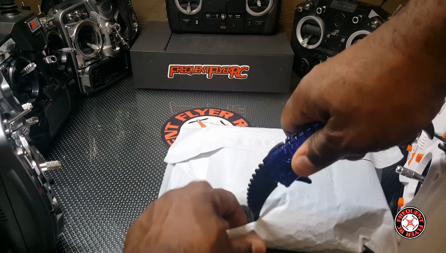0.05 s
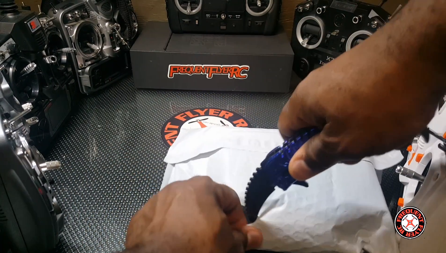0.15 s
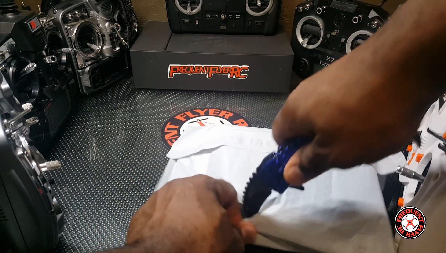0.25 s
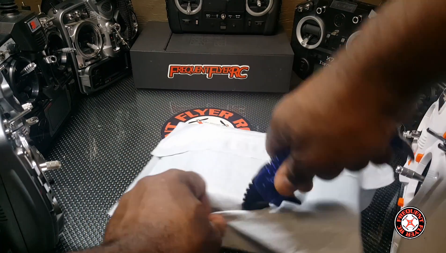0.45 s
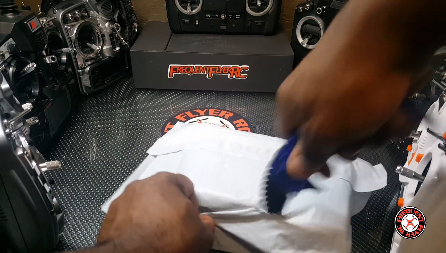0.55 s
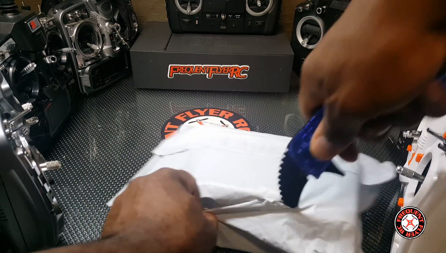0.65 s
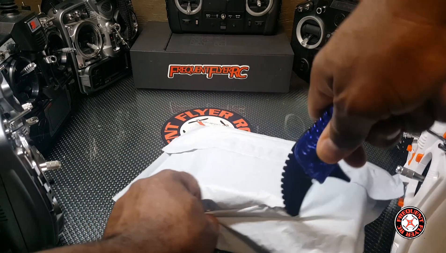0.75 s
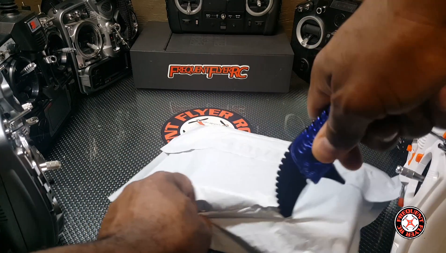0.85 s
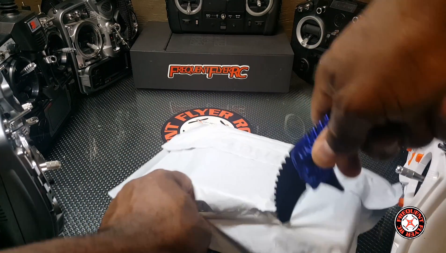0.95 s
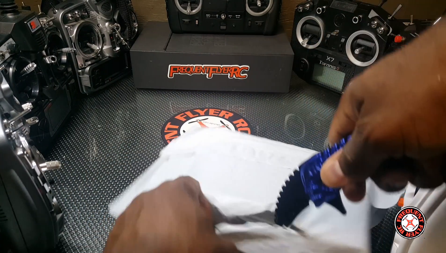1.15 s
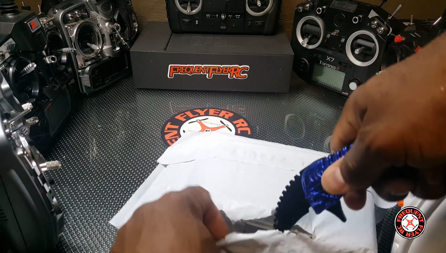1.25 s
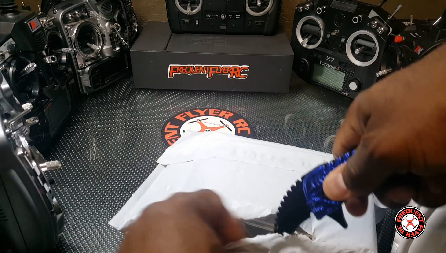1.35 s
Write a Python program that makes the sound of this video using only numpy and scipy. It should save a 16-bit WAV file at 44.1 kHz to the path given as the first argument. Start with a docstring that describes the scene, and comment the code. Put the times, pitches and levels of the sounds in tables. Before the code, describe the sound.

Close, dry crinkling of a plastic parcel being held and cut with a serrated blade: sharp film snaps and low padded knocks peak early, then fade to small light ticks over quiet room tone.

```python
"""Crackle, snapping creases and dull thumps run through the whole scene: a padded plastic mailer is held
and sawn open with a serrated blade on a table, close to the microphone. Creases are short damped sines
with bursts of treble noise, the parcel's thumps are lower damped modes, and the strained film is a shower
of tiny grains over shaped noise. A small room answers the snaps and thumps; steady room tone and a table
rumble lie below."""
import sys
import numpy as np
from scipy import signal
from scipy.fft import rfft, irfft, next_fast_len
from scipy.io import wavfile
from scipy.ndimage import map_coordinates

SR = 44100
rng = np.random.default_rng(int(sys.argv[2]) if len(sys.argv) > 2 else 0)


def makeup_ratio(level_db):
    """Linear amplitude ratio for a level in decibels (20 dB per factor of ten)."""
    decades = np.asarray(level_db, float) / 20
    return 10 ** decades


def to_wav(sig):
    """Store sig (one row per channel, or 1-D mono) as 16-bit WAV at the path in sys.argv[1].

    Samples outside -1..1 are clipped; the rate is SR.
    """
    pcm = np.clip(np.atleast_2d(sig), -1, 1) * 32767
    pcm = np.round(pcm).astype(np.int16)
    wavfile.write(sys.argv[1], SR, pcm.T)  # frames by channels


N = 61739  # length in samples, 1.4 s


def unit(x):
    """Scale to rms 1."""
    return x / np.sqrt(np.mean(x ** 2) + 1e-20)


def along(points, hz):
    """Interpolate (Hz, value) points on a log frequency axis."""
    f, value = np.transpose(points)
    return np.interp(np.log(hz + 1), np.log(f + 1), value)


def filtered(x, response):
    """Multiply the spectrum of x by a response of frequency."""
    size = next_fast_len(N + 8192)
    spectrum = rfft(x, size) * response(np.fft.rfftfreq(size, 1 / SR))
    return irfft(spectrum, size)[..., :N]


def noise(spectrum):
    """Coloured noise of rms 1."""
    white = rng.standard_normal(N)
    return unit(filtered(white, lambda hz: makeup_ratio(along(spectrum, hz))))


def wobble(rate):
    """A smooth random curve with rate knots a second."""
    knots = rng.standard_normal(int(N * rate / SR) + 4)
    return map_coordinates(knots, [np.arange(N) * rate / SR])


def lay(start_s, rows):
    """Sum the rows of a matrix, each starting at its time."""
    at = np.round(start_s * SR).astype(int)[:, None] + np.arange(rows.shape[1])
    return np.bincount(at.ravel(), rows.ravel(), N + SR)[:N]


def rings(db, hz, t60, size, attack=0.00022):
    """One damped sine a row, size samples long, swelling with the attack time constant in seconds."""
    t = np.arange(size) / SR
    db, hz, t60 = (np.broadcast_to(v, np.shape(db))[:, None] for v in (db, hz, t60))
    decay = makeup_ratio(db - 60 * t / t60)
    return decay * np.sin(2 * np.pi * hz * t) * (1 - np.exp(-t / attack))


# Tone of the quiet room. Each row: frequency in Hz, relative density in dB per Hz.
ROOM_TONE_SPECTRUM = [(24, -16), (40, 14.5), (377, -28), (550, -8), (656, -24), (12800, -40), (16500, -54)]


def room_tone():
    """The air of the place: steady noise, mostly low."""
    return makeup_ratio(-46.5) * noise(ROOM_TONE_SPECTRUM)


# How long the room holds each frequency. Each row: frequency in Hz, t60 in seconds.
ROOM_DECAY = [(200, 0.28), (2000, 0.23), (10000, 0.009)]


def room(x):
    """Each frequency of the room's answer dies at its own speed; it starts 90 samples late."""
    hz, t, grid = signal.stft(rng.standard_normal(SR // 3), SR, nperseg=256)
    decay = makeup_ratio(-60 * t / along(ROOM_DECAY, hz)[:, None])
    tail = signal.istft(grid * decay, SR, nperseg=256)[1]
    return signal.fftconvolve(np.pad(x, (90, 0)), tail / np.linalg.norm(tail))[:N]


# Deep rumble of the table. Each row: frequency in Hz, relative density in dB per Hz.
TABLE_SPECTRUM = [(20, 4), (55, 15), (110, -14), (200, -50)]


def table_rumble(swing_db):
    """Handling shakes the table: deep noise that partly follows the swing of the strain."""
    level_db = -47.5 + 0.77 * swing_db + 1.8 * wobble(7.4)
    return makeup_ratio(level_db) * noise(TABLE_SPECTRUM)


# Lows of the padding. Each row: frequency in Hz, relative density in dB per Hz.
PADDING_SPECTRUM = [(47, -41), (80, -1.5), (316, -6.5), (403, -9), (1000, -16.5), (1300, -55), (2200, -120)]


def padding_rumble(swing_db):
    """The padding rumbles on the table: lumpy low noise that partly follows the swing of the strain."""
    lumps_db = 1.5 * wobble(40)
    return makeup_ratio(-44.5 + 0.69 * swing_db + lumps_db) * noise(PADDING_SPECTRUM)


def settling(db):
    """After each snap the creases around it settle: a level that dies away, added in power."""
    SETTLE_T60, RISE_S = 0.025, 0.0029
    t = np.arange(4000) / SR
    power = makeup_ratio(db[:, None] - 60 * t / SETTLE_T60) ** 2 * (1 - np.exp(-t / RISE_S))
    return np.sqrt(lay(np.transpose(CREASE_SNAPS)[0], power))


def grains(rate, hz, octaves, cycles, spread_db):
    """A random shower of tiny snaps, rate a second, scattered in pitch and size; rms 1."""
    count = int(rate * N / SR)
    u, g = rng.random((count, 2)), rng.standard_normal(count)
    pitch = np.clip(hz * 2 ** (octaves * g), 950, 15500)
    size_db = np.minimum(-spread_db * np.log(u[:, 1]), 4 * spread_db)
    shower = rings(size_db, pitch, cycles / pitch, size=400, attack=0.0001)
    return unit(lay(u[:, 0] * N / SR, shower))


# Rustle of the film. Each row: frequency in Hz, relative density in dB per Hz.
RUSTLE_SPECTRUM = [(500, -6), (900, -20), (1270, 7.5), (1800, -43), (2600, 1.5), (3600, -9.5), (5000, -31),
                   (8000, -52)]


def film_crackle(level):
    """The stressed film crackles in tiny grains over a rustle of shaped noise."""
    crackle = makeup_ratio(-2) * grains(rate=1600, hz=2330, octaves=0.6, cycles=4.9, spread_db=3)
    return level * (crackle + makeup_ratio(-5.5) * noise(RUSTLE_SPECTRUM))


# Treble of hiss and cracks. Each row: frequency in Hz, relative density in dB per Hz.
TREBLE_SPECTRUM = [(2500, -10.5), (4000, -1.5), (5200, -6.5), (7000, -8), (11500, -8), (15300, -23),
                   (16100, -37), (16800, -50)]


def film_hiss(level):
    """The film hisses in the treble, and the hiss flickers."""
    flicker_db = 2.7 * wobble(500)
    return level * makeup_ratio(-6 + flicker_db) * noise(TREBLE_SPECTRUM)


# Strain on the film. Each row: time in seconds, crackle level in dB, hiss level in dB,
# both before the trims and the flurries of settling.
FILM_STRAIN = [(0, -48, -48), (0.068, -38, -39.5), (.12, -45.5, -44), (.19, -48.5, -42.5), (.3, -42, -42.5),
               (.38, -30, -30.5), (0.411, -40.5, -34), (0.432, -22, -21), (0.46, -38, -38.5),
               (0.489, -23.5, -27), (0.529, -35, -38), (0.569, -41, -41), (0.587, -27.5, -36.5),
               (0.652, -32.5, -32.5), (0.68, -23, -31.5), (0.721, -38.5, -40), (.79, -46, -46.5),
               (.87, -51, -49), (.95, -54.5, -46), (.99, -57.5, -61), (1.027, -59, -48),
               (1.049, -46.5, -37.5), (1.1, -46, -42.5), (1.14, -52, -47), (1.171, -42, -40.5),
               (1.251, -42.5, -44.5), (1.29, -52.5, -51), (1.4, -51, -47)]


def strain():
    """The film under strain crackles, rustles and hisses; the padding and the table rumble along."""
    SETTLE_DB, SETTLE_HISS_DB = -24.5, -8.5  # added to each snap's ring and crack levels
    s, *columns = np.transpose(FILM_STRAIN)
    crackle_db, hiss_db = (np.interp(np.arange(N) / SR, s, c) for c in columns)
    _, snap_db, _, _, crack_db = np.transpose(CREASE_SNAPS)
    swing_db = crackle_db - crackle_db.mean()
    shared_wobble = makeup_ratio(1.2 * wobble(90))
    film = film_crackle(makeup_ratio(crackle_db) + settling(snap_db + SETTLE_DB))
    hiss = film_hiss(makeup_ratio(hiss_db) + settling(crack_db + SETTLE_HISS_DB))
    return shared_wobble * (film + hiss + padding_rumble(swing_db)) + table_rumble(swing_db)


# Modes of the padded wall. Each row: multiple of the knock's pitch, level in dB before scatter.
WALL_MODES = [(1, -1), (1.68, -5), (2.6, -12)]
# The padded wall flexes with a dull knock. Each row: start in seconds, level in dB before the trim,
# pitch in Hz, t60 of the lowest mode in seconds.
WALL_THUMPS = [(0.0382, -24.5, 438, 0.025), (.069, -23, 260, 0.039), (.078, -21, 143, 0.06),
               (0.2058, -17.5, 344, 0.03), (.2058, -11, 790, 0.0092), (0.264, -26.5, 285, 0.034),
               (0.312, -14.5, 232, 0.024), (0.351, -23, 197, 0.053), (.376, -23, 193.3, 0.094),
               (.422, -22, 548, 0.055), (.43, -19.5, 160, 0.076), (.479, -9.5, 317, 0.047),
               (.487, -6.5, 316, 0.044), (0.499, -26, 229, 0.066), (.576, -17.5, 177.5, 0.065),
               (0.591, -20.5, 208, 0.057), (.635, -20.5, 490, .03), (0.67, -30, 336, 0.015),
               (.6852, -7, 693, 0.018), (0.687, -3, 312.6, 0.046), (0.704, -17.5, 207.5, 0.13),
               (0.7151, -8, 505, 0.027), (.722, -13.5, 333, .07), (.739, -19, 208, 0.029),
               (0.754, -24.5, 587, 0.024), (.812, -29, 230, 0.054), (.904, -28, 218, 0.038),
               (0.924, -34.5, 235, 0.035), (1.109, -32.5, 518, 0.064), (1.1509, -25, 551, 0.055),
               (1.152, -23.5, 250, 0.023), (1.162, -30.5, 640, 0.027), (1.165, -29, 248, 0.11),
               (1.209, -23, 290, 0.047), (1.209, -29, 566, 0.036), (1.242, -27.5, 121, 0.068),
               (1.356, -32.5, 316, 0.019)]


def thumps():
    """Each flex rings at the pitch its fold gives it; the upper modes die sooner."""
    THUMP_DB, RISE_CYCLES = 3, 0.3  # trim; swell time constant in cycles of the pitch
    THUMP_LOW_CUT_HZ = 93  # the thumps carry little below this
    s, db, pitch, t60 = np.transpose(WALL_THUMPS)
    scatter_db = rng.normal(0, 2, (len(s), len(WALL_MODES)))
    scatter_db[:, 0] = 0  # the lowest mode keeps its level
    rise = RISE_CYCLES / pitch[:, None]
    rows = 0
    for k, (ratio, level) in enumerate(WALL_MODES):
        mode_db = db + THUMP_DB + level + scatter_db[:, k]
        rows = rows + rings(mode_db, pitch * ratio, t60 / ratio, size=4000, attack=rise)
    return filtered(lay(s, rows), lambda f: (1j * f / (THUMP_LOW_CUT_HZ + 1j * f)) ** 2)


# Creases buckling. Each row: start in seconds, ring level in dB, ring pitch in Hz,
# air pocket level in dB, crack level in dB, the levels before the trims.
CREASE_SNAPS = [(0.065, -23, 1780, -28, -28), (0.069, -14.5, 3160, -28, -39),
                (0.104, -23, 3300, -25, -27.5), (0.2099, -18, 2450, -38, -27.5),
                (0.2137, -12, 3280, -50, -26.5), (0.2417, -9.5, 2660, -21, -27),
                (0.2669, -9.5, 2700, -11.5, -14.5), (0.3062, -34, 4770, -30, -23),
                (0.3125, -5.5, 3150, -23, -23), (0.335, -9.5, 3350, -36, -26),
                (0.3487, -13, 2680, -36, -36), (0.3601, -9, 3850, -10.5, -12), (0.373, -14, 2910, -13, -35),
                (0.375, -31, 1700, -15.5, -16), (0.3791, -19, 2590, -14.5, -28),
                (0.413, -10, 2560, -21, -25), (0.4225, -6.5, 1830, -7.5, -15),
                (0.434, -4.5, 2750, -13, -11), (0.4359, -17, 4500, -14, -12),
                (0.469, -1.5, 2720, -12.5, -37), (0.472, -0.5, 2470, -9.5, -15),
                (0.4776, -9.5, 1700, -8.5, -33), (0.4842, -8, 1730, -10, -11), (0.497, -12, 2500, -43, -17),
                (0.5565, -21, 3160, -35, -23), (0.576, -11, 1890, -18, -13.5),
                (0.5869, -8, 2530, -14.5, -16), (0.6173, -15, 2780, -35, -27), (0.6215, -9, 2400, -20, -20),
                (0.657, -12, 2430, -34, -38), (0.6739, -3.5, 2530, -15, -14),
                (0.6863, -10.5, 1600, -19, -16.5), (0.7161, -18, 1650, -16.5, -46),
                (0.738, -16, 2620, -22, -50), (0.759, -15.5, 2880, -24.5, -21.5),
                (0.8074, -15.5, 3500, -27.5, -19), (0.8847, -7, 3930, -28.5, -23),
                (0.939, -15, 3170, -28, -46), (0.945, -21.5, 3720, -38, -34),
                (1.0225, -34, 3540, -45, -32.5), (1.0775, -24, 3040, -38, -40),
                (1.0848, -20.5, 3250, -44, -32), (1.0979, -22.5, 3530, -58, -32),
                (1.1126, -23, 1900, -63, -29), (1.1119, -20, 3300, -51, -51),
                (1.198, -27, 1850, -55, -35.5), (1.3316, -17, 2750, -30, -28.5),
                (1.361, -39, 1620, -28.5, -42), (1.372, -31.5, 1800, -38, -58)]


def snaps():
    """Each crease rings briefly at its own pitch, sets the air pocket going and cracks in the treble."""
    SNAP_DB, POCKET_DB, CRACK_DB = 4.5, 7, -0.5  # trims
    SNAP_CYCLES = 9.66  # the ring falls 60 dB in this many cycles
    POCKET_HZ, POCKET_T60, CRACK_T60 = 1310, 0.008, 0.0035
    s, db, hz, pocket_db, crack_db = np.transpose(CREASE_SNAPS)
    film = rings(db + SNAP_DB, hz, SNAP_CYCLES / hz, size=600)
    pocket_hz = POCKET_HZ * (1 + 0.067 * rng.standard_normal(len(s)))
    pocket = rings(pocket_db + POCKET_DB, pocket_hz, POCKET_T60, size=600, attack=0.00066)
    white = rng.standard_normal((len(s), 600))
    hiss = irfft(rfft(white) * makeup_ratio(along(TREBLE_SPECTRUM, np.fft.rfftfreq(600, 1 / SR))))
    fade = makeup_ratio(-60 * np.arange(600) / SR / CRACK_T60)
    burst = hiss * fade
    # every burst gets the energy of the fade itself
    burst = burst * np.linalg.norm(fade) / np.linalg.norm(burst, axis=1)[:, None]
    crack = makeup_ratio(crack_db[:, None] + CRACK_DB) * burst
    return lay(s, film + pocket + crack)


def scene():
    """The mailer, the room's answer to its snaps and thumps, and the room tone."""
    hits = snaps() + thumps()
    answer = makeup_ratio(-19) * room(hits)
    return (hits + answer + strain() + room_tone())[None]


def band_limit(x):
    """A steep low-pass at the top of the band."""
    return signal.sosfilt(signal.butter(12, 17000, fs=SR, output="sos"), x)


def record(dry):
    """The close microphone rolls off the deep bass and stops sharply at the top."""
    LOW_CUT_HZ, TOP_HZ = 89, 16900
    mix = filtered(dry, lambda hz: (hz < TOP_HZ) * hz ** 2 / (hz ** 2 + LOW_CUT_HZ ** 2))
    return band_limit(mix)


dry = scene()
out = record(dry)
to_wav(out)
```